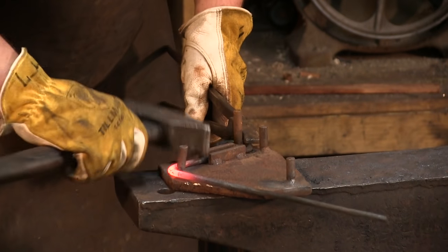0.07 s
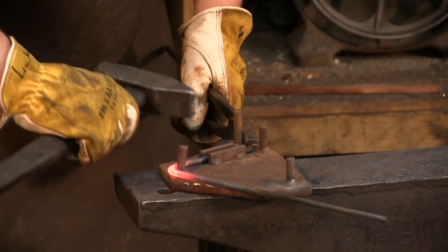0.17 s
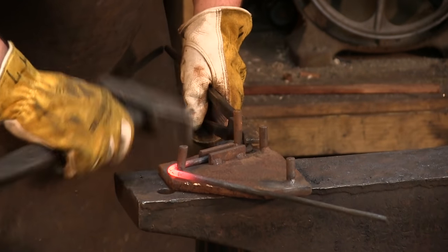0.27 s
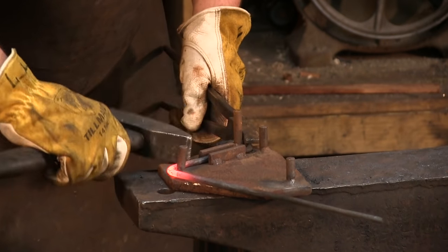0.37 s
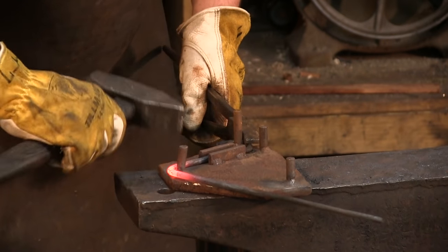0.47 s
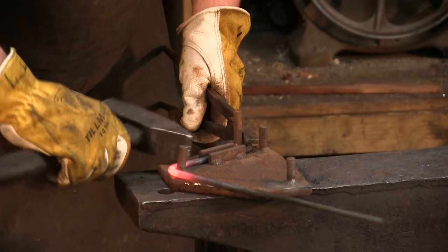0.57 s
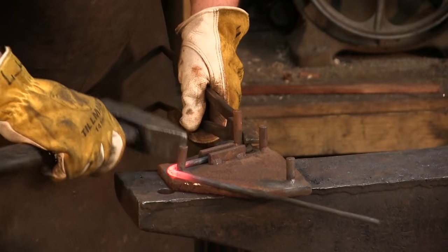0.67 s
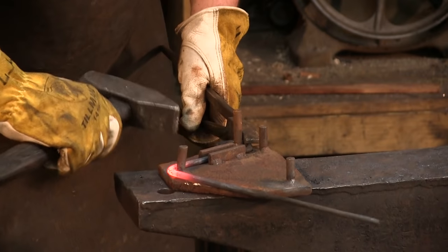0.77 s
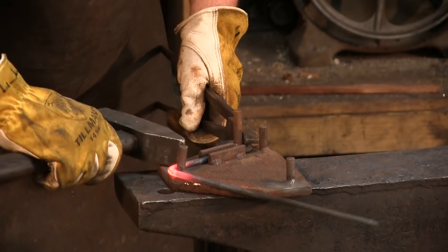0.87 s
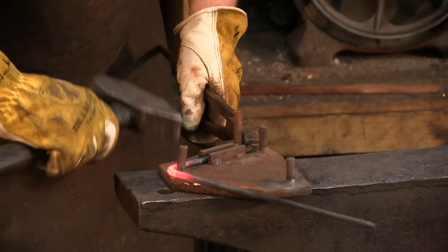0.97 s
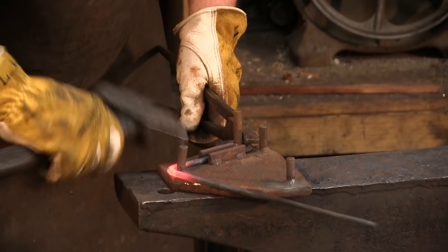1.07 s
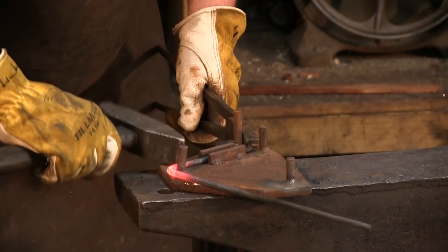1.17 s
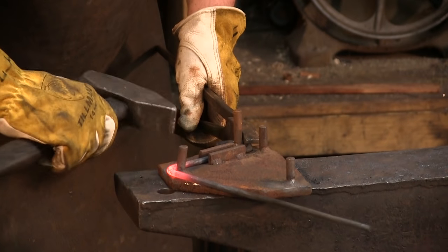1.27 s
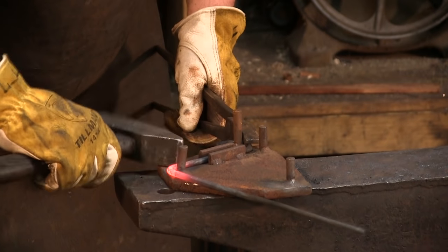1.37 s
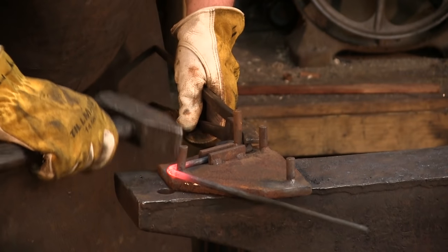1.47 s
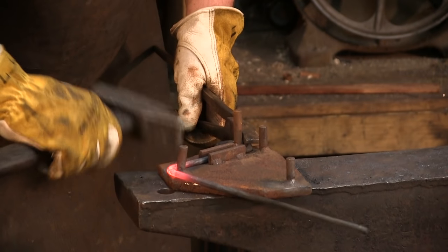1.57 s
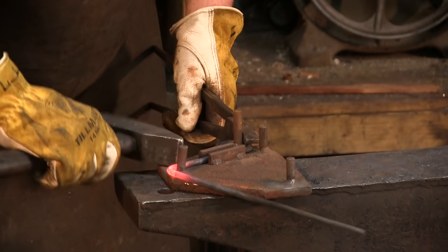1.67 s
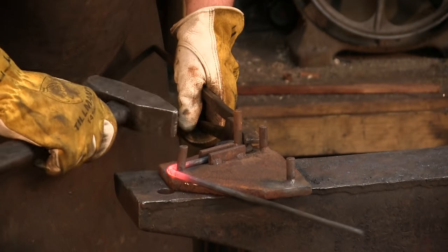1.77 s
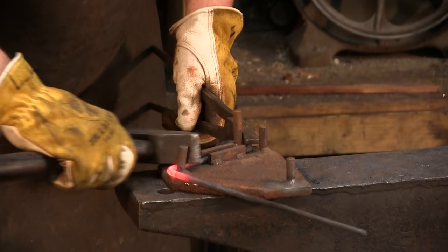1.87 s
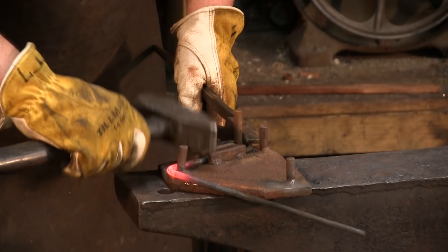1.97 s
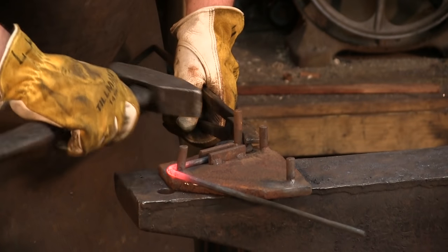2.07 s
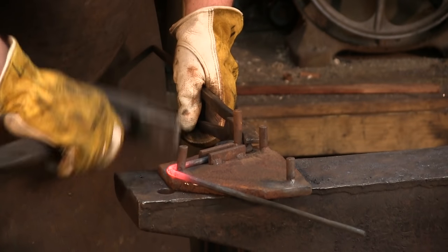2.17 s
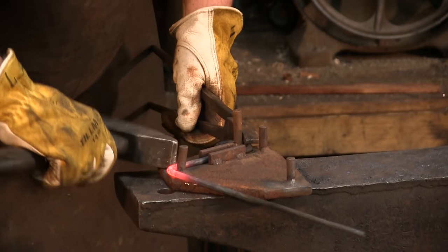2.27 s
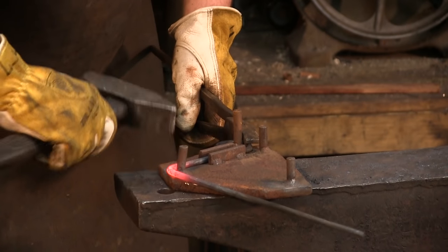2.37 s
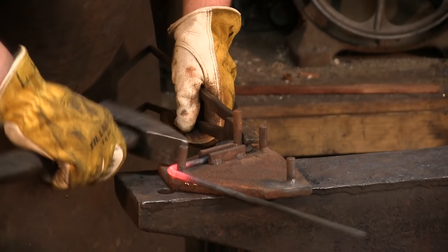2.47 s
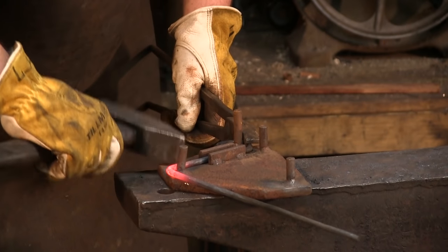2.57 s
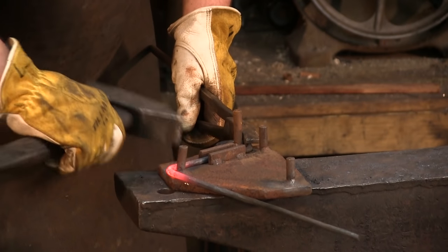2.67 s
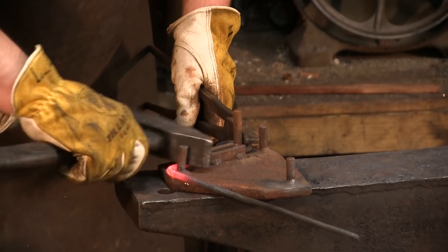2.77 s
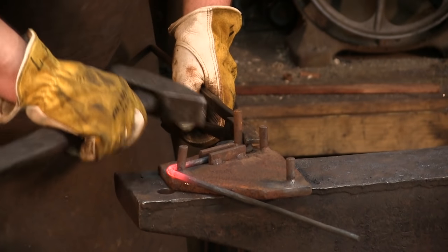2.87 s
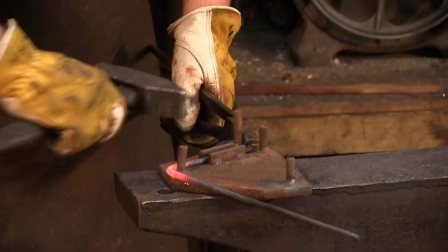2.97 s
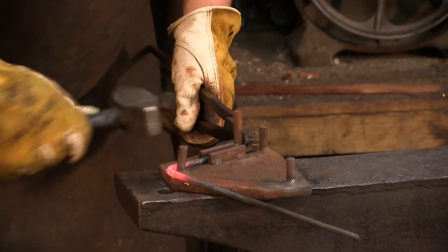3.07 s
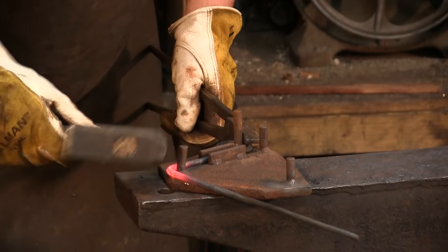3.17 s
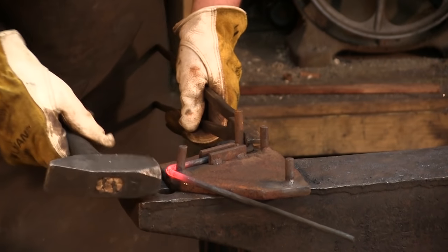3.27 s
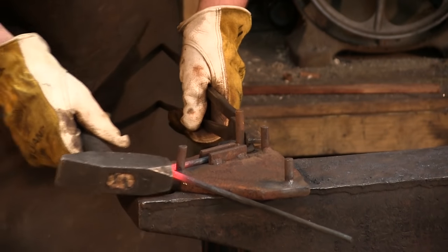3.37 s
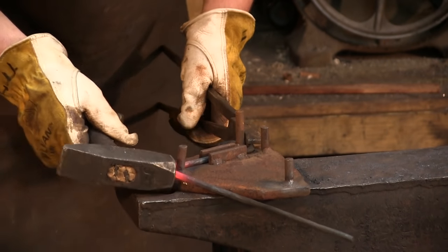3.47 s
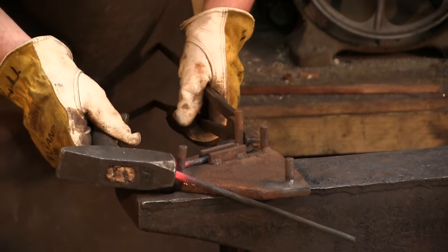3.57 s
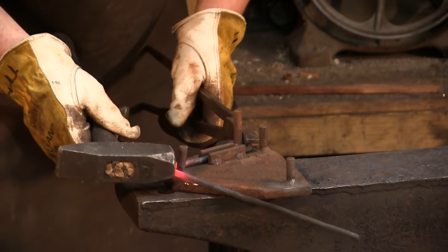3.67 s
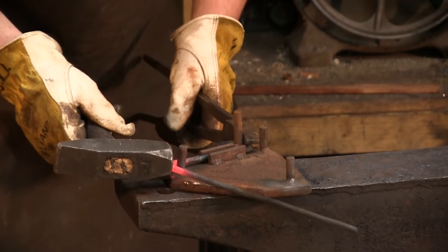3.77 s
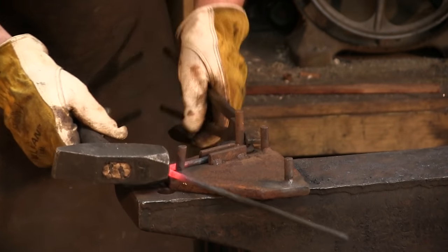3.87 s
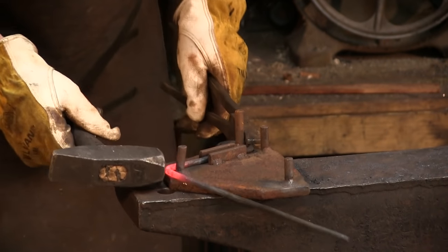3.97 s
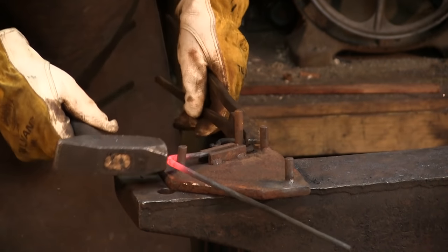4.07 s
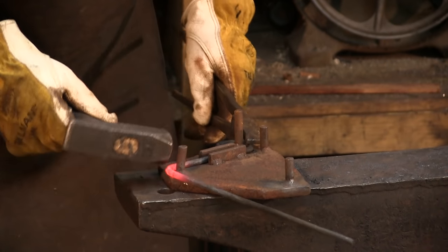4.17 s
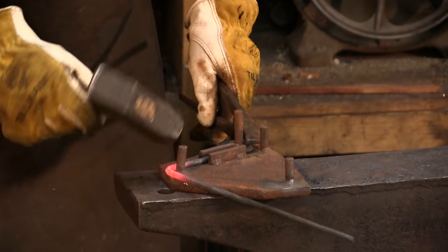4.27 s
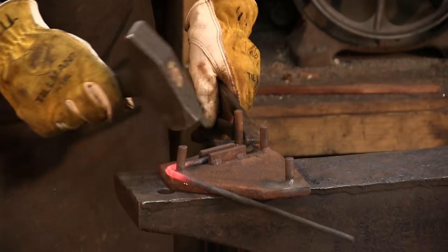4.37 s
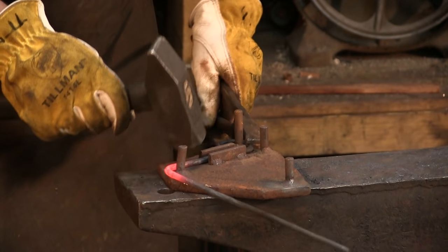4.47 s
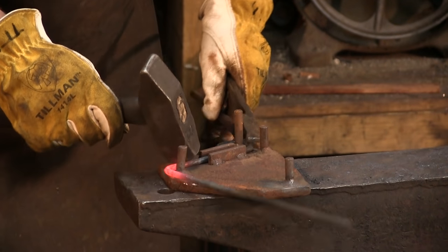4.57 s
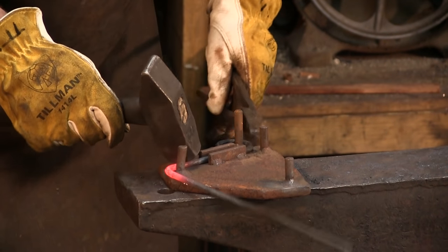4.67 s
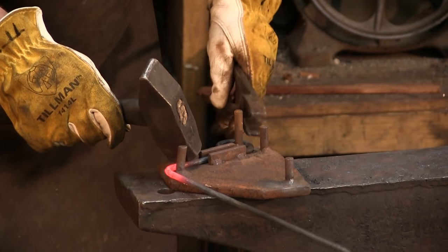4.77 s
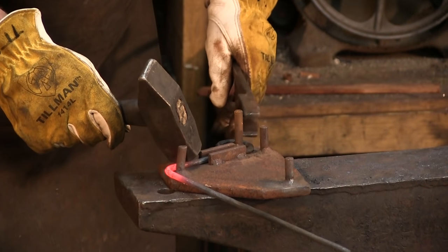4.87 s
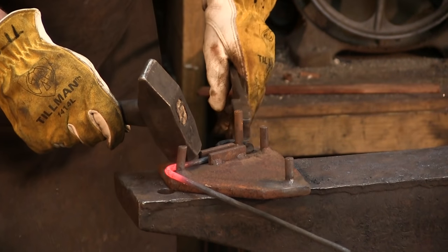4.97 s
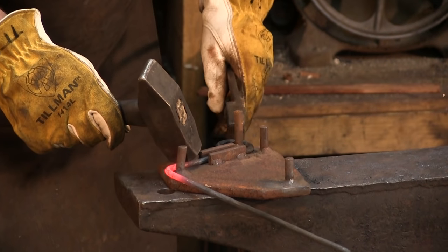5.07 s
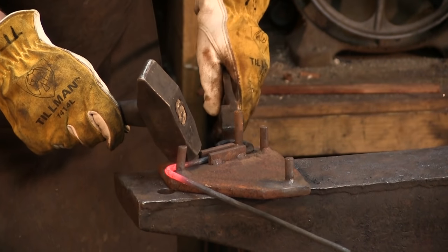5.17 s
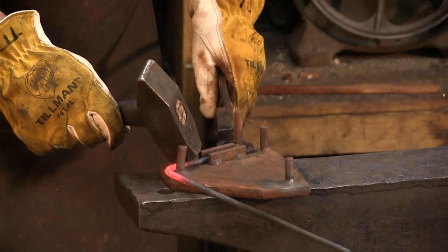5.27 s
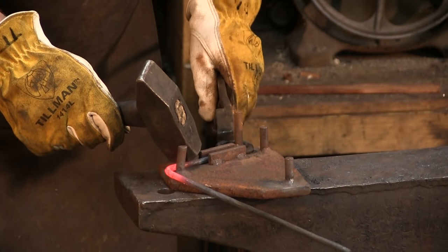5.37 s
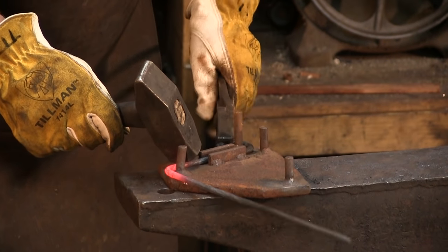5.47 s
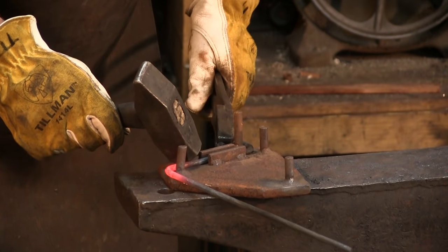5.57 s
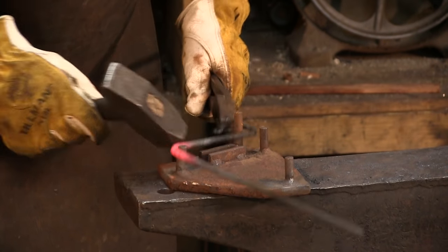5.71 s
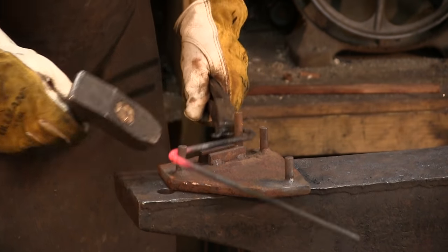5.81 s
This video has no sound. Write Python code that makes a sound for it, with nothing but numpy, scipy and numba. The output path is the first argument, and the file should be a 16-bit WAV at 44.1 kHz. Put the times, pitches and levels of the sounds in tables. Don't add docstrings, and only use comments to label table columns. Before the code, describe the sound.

A hand hammer strikes hot steel on an anvil jig in quick ringing blows, then scrapes, taps, and loose metallic knocks follow in a workshop.

```python
import sys
import numpy as np
from scipy import signal
from scipy.fft import rfft, irfft
from scipy.io import wavfile
from scipy.ndimage import uniform_filter1d
from numba import njit

SR = 44100
rng = np.random.default_rng(int(sys.argv[2]) if len(sys.argv) > 2 else 0)


def elevation(decibels):
    levels = np.asarray(decibels, float)
    return 10 ** (levels / 20)


def file_out(sig):
    cols = np.atleast_2d(sig).T
    lim = np.clip(cols, -1, 1)
    pcm = np.round(lim * 32767).astype(np.int16)
    wavfile.write(sys.argv[1], SR, pcm)


N = 257544
LEAD = SR // 4
M = N + LEAD


def along(table, hz):
    table = np.array(table)
    return np.interp(np.log(np.maximum(hz, 1)), np.log(table[:, 0]), table[:, 1])


def colour(x, spectrum):
    gain = elevation(along(spectrum, np.fft.rfftfreq(len(x), 1 / SR)))
    y = irfft(rfft(x) * gain, len(x))
    return y / np.sqrt(np.mean(y ** 2))


def band(x, lo_hz, hi_hz):
    return signal.sosfilt(signal.butter(2, (lo_hz, hi_hz), "bandpass", fs=SR, output="sos"), x)


def poles(modes):
    hz, _, t60 = np.transpose(modes)
    return np.exp(2j * np.pi * hz / SR - np.log(1000) / (np.clip(t60, .01, 3) * SR))


@njit
def resonate(force, poles, grip):
    out = np.zeros(force.shape[1])
    for m in range(len(poles)):
        z = 0j
        for i in range(force.shape[1]):
            z = z * poles[m] * grip[i] + force[m, i]
            out[i] += z.imag
    return out


def ring(modes, at, db, scatter_db, keep):
    chance = rng.standard_normal((len(at), 2, len(modes)))
    force, grip = np.zeros((len(modes), M)), np.ones(M)
    level_db = db[:, None] + np.array(modes)[:, 1] + scatter_db * chance[:, 0]
    force[:, at] = (elevation(level_db) * np.sign(chance[:, 1])).T
    grip[at] = np.clip(keep, 0, 1)
    return resonate(force + 1e-18, poles(modes), grip)


def burst(at, db, t60, noise):
    kicks = np.zeros(M)
    kicks[at] = elevation(db)
    decay = np.exp(-np.log(1000) / (t60 * SR))
    return noise * signal.lfilter([1], [1, -decay], kicks)


def where(table):
    s, *db = np.transpose(table)
    return LEAD + np.round(s * SR).astype(int), *db


def rattle(at, db, count):
    mean_gap_s, first_db, fall_db = .004, -8, -1.5
    gaps = rng.uniform(.3, 1.7, (len(at), count)) * mean_gap_s * SR
    again = at[:, None] + np.c_[np.zeros(len(at)), np.cumsum(gaps, axis=1)].astype(int)
    loss_db = np.r_[0, first_db + fall_db * np.arange(count)]
    return again.ravel(), *((column[:, None] + loss_db).ravel() for column in db)


# f/Hz, level per Hz/dB
SHOP_SPECTRUM = [(15, -41), (25, -9), (76, 3), (92, -4), (463, -9), (936, -14), (2160, -22), (4030, -16.5),
                 (5430, -20), (6050, -28.5), (7310, -15.5), (8360, -31.5), (12200, -35), (14800, -30.5),
                 (16000, -43)]


def shop():
    level_db, k = -56, SR // 6
    sway = uniform_filter1d(np.repeat(rng.standard_normal(N // k + 1), k), k)[:N]
    return colour(rng.standard_normal(N), SHOP_SPECTRUM) * elevation(level_db + 1.4 * sway)


# f/Hz, t60/s
ROOM_DECAY = [(80, 1.1), (210, 0.72), (560, 0.49), (1500, 0.49), (4000, 0.48), (8000, 0.46), (14000, 0.4)]


def room(dry):
    room_db, wall_db, wall_s = -9, -24.5, .1638
    t, tail = np.arange(SR) / SR, 0
    for hz in 63 * 2 ** np.arange(0, 8.5, .5):
        noise = colour(rng.standard_normal(SR), [(hz / 2.5, -40), (hz, 0), (hz * 2.5, -40)])
        tail = tail + noise * np.sqrt(hz) * elevation(-60 * t / along(ROOM_DECAY, hz))
    tail *= np.clip(t / 0.0071, 0, 1) ** 2
    tail *= elevation(room_db) / np.sqrt(np.sum(tail ** 2))
    slap = np.pad(band(dry, 4320, 4460), (int(wall_s * SR), 0))[:M]
    return dry + signal.fftconvolve(dry, tail)[:M] + elevation(wall_db) * slap


# touch t/s, fastest t/s, lift t/s, grit level/dB, chatter minus grit level/dB
DRAGS = [
    (3.174, 3.35, 3.47, -28.5, -12.5),
    (3.674, 3.768, 3.925, -32.5, 2.5),
]
# f/Hz, level per Hz/dB
GRIT_SPECTRUM = [(88, -37), (150, -7.5), (270, -8), (361, -4), (578, -8), (854, -6), (2600, -5.5),
                 (4580, -4), (16000, -35.5)]


def drag():
    touch_db, lift_db, swing_curve = -32.5, -39.5, 1.54
    t = (np.arange(M) - LEAD) / SR
    slips = rng.standard_normal(M) * (rng.random(M) < .2) * elevation(1.1 * rng.exponential(size=M))
    jolts = rng.standard_normal(M) * (rng.random(M) < .005)
    flutter = uniform_filter1d(np.repeat(rng.standard_normal(M // 200 + 1), 200), 200)[:M]
    grit = colour(slips, GRIT_SPECTRUM) * elevation(1.4 * flutter)
    chatter = colour(jolts, [(300, -14.5), (700, -17.0), (950, 3.5), (1300, -7), (2500, -34)])
    out = 0
    for touch, fastest, lift, grit_db, low_db in DRAGS:
        away = np.interp(t, (touch, fastest, lift), (1, 0, 1)) ** swing_curve
        db = grit_db + away * np.where(t < fastest, touch_db, lift_db)
        touching = (t > touch) & (t < lift)
        out = out + elevation(db) * touching * (grit + elevation(low_db - 2.5) * chatter)
    return out


# f/Hz, level/dB, t60/s
CLANG_MODES = [(4385, 1.5, 0.032), (4720, -24.5, .1), (4460, -21.5, 0.059), (4800, -21, 0.16),
               (4480, -17.5, .1), (4150, -30, 0.22), (4320, -22.5, 0.028), (4385, -15.5, 0.12),
               (4413, -12, 0.067), (4515, -16.5, 0.062)]
JIG_LOW_MODES = [(1320, -6, .04), (1527, -4, .1), (1590, -5, .05), (1805, -9, .06), (1950, -8, .03)]
JIG_HIGH_MODES = [(2300, -7, .03), (2470, -4, .04), (2670, -3, .04), (2860, -4, .035), (2995, -4, .06),
                  (3270, -4, .045), (3310, -6, .055), (3700, -7, .03)]
# f/Hz, level per Hz/dB
CRACK_SPECTRUM = [(200, -37), (800, 1), (1500, 2.5), (2800, 7), (4000, 1.5), (6000, -8.5), (10000, -50)]


def jig(at, pin_db, low_db, high_db, keep, crack_db):
    bodies = ring(CLANG_MODES, at, pin_db, 0.87, keep)
    bodies += ring(JIG_LOW_MODES, at, low_db + 0.5, 3.7, keep)
    bodies += ring(JIG_HIGH_MODES, at, high_db - 4, 3.7, keep)
    crack = burst(at, high_db + crack_db, 0.03, colour(rng.standard_normal(M), CRACK_SPECTRUM))
    return band(bodies, 700, 6000) + band(crack, 200, 15000)


def tick(at, db, t60):
    noise = colour(rng.standard_normal(M), [(3500, -31.5), (6000, 11), (12000, -7), (16000, -11.0)])
    return burst(at, db, t60, noise)


# t/s, force level/dB, dullness/dB, handle ring level/dB, tick level/dB
KNOCKS = [(0.185, -22.5, 1, -76, -39), (3.1532, -45, -4, -82, -42.5), (3.2154, -44, -10, -71, -68),
          (4.2732, -26.5, -9.5, -51, -32), (4.5336, -49.5, -18, -85, -52), (4.591, -50.5, -17, -85, -69),
          (4.6548, -25, -20, -71, -38.5), (4.6674, -27, -30, -63, -51), (4.6818, -27, -22, -66, -57),
          (4.8055, -32.5, -22, -72, -59), (4.8324, -32, -4.5, -83, -68), (4.8703, -41, -19, -84, -71),
          (5.4004, -35.5, 1, -84, -69), (5.5318, -30, -20, -59, -33), (5.5454, -32, -14, -70, -34),
          (5.5844, -41, -19, -75, -60), (5.6136, -42.5, -5.5, -79, -64), (5.6294, -52.5, -8, -85.5, -65),
          (5.75, -58, -13, -76, -63), (5.7644, -54, -12, -73, -57), (5.7894, -55, -10, -69, -59)]
# f/Hz; then level/dB, t60/s
HANDLE_HZ = [7472, 8468, 9932, 12260, 12440, 14010]
HANDLE_RING = [(-1, 0.24), (-20, 0.23), (-4, .22), (-10, 0.2), (-9, 0.33), (-23, 0.19)]
# f/Hz; then level/dB, t60/s
CHEEK_HZ = [5060, 5152, 5232, 5690, 5900]
CHEEK_RING = [(-5, .06), (0, .17), (-3, .26), (-9, .25), (-6, .12)]


def tongs():
    at, force_db, dull_db, ring_db, tick_db = where(KNOCKS)
    miss_db = np.maximum(dull_db + 8.5, 0)
    pin_db = force_db - 1 - 2.8 * miss_db
    handles = ring(np.column_stack([HANDLE_HZ, HANDLE_RING]), at, ring_db + 10.0, 0.73, keep=0.72)
    jaws = ring(np.column_stack([CHEEK_HZ, CHEEK_RING]), at, pin_db - 15.5, 2.7, keep=0.45)
    loose = rattle(at, (pin_db - 1.5, force_db + dull_db - 4.0, force_db - 0.5), count=3)
    soft_db = np.repeat(miss_db, len(loose[0]) // len(at))
    knocks = jig(*loose, keep=1.0, crack_db=-6.0 - 1.6 * soft_db)
    return knocks + handles + band(jaws, 2000, 12000) + tick(at, tick_db + 3.0, 0.012)


# t/s, force level/dB, face clang minus force level/dB, head ring level/dB, crack level/dB
BLOWS = [(0.1009, -26, 2, -36.5, -26.5), (0.1069, -24, 6.5, -34, -37.5), (0.4123, -8.5, 6.5, -21.5, -20.5),
         (0.6827, -8, -11, -30, -17), (0.9382, -8, 1, -19.5, -38), (1.201, -9.5, 1, -26, -15.5),
         (1.4597, 2, 7, -17.5, -19), (1.471, -4.5, -4.5, -19.5, -16.5), (1.712, -10, -2, -26, -14),
         (1.949, -6.5, -12.5, -23.5, -15), (2.3129, 2.5, 4, -15, -14.5), (2.586, 0, 7.5, -17.5, -15),
         (2.8252, -4, -10, -32.5, -22), (2.8361, -2, 7.5, -20.5, -14.5)]
BOUNCES = [(0.1119, -17, -8, -27.5, -42), (0.4418, -10.5, 7.5, -28, -34), (0.7131, -7, 6, -32, -31.5),
           (0.9586, -15, 8, -33, -39), (1.2275, -6, 7, -18.5, -29.5), (1.735, -7.5, 9, -35.5, -22),
           (1.9655, -3, -6, -32.5, -22.5), (2.3229, -25, 14, -21.5, -45.5), (2.8511, -12.5, 5, -20, -25.5),
           (3.5166, -8.5, 3, -30.5, -24.5)]
# the same level/dB columns, without t/s
EARLIER_DB = (-14.5, -0.5, -29, -34)


def contacts():
    earlier_s, yield_db = -.15, -12
    rows = [(earlier_s, *EARLIER_DB), *BLOWS, *BOUNCES]
    at, force_db, face_db, head_db, crack_db = where(rows)
    share_db = np.where(np.arange(len(rows)) <= len(BLOWS), 1, -8.5)
    return at, force_db, face_db, head_db, crack_db, np.minimum(force_db, yield_db) + share_db


# t/s, stand level/dB, anvil body level/dB
THUDS = [(0.116, -12, -18.5), (0.185, -33, -27.5), (3.432, -42, -39.5), (3.516, -50, -23),
         (3.741, -51, -41), (3.778, -45, -27), (3.939, -29, -38), (4.272, -36.5, -44.5),
         (4.663, -38, -37.5), (4.712, -30.5, -41), (4.831, -36.5, -38.5), (4.914, -37, -39),
         (5.401, -37, -39), (5.544, -37, -45), (5.765, -46, -50.5)]
# t/s, level/dB
TAPS = [
    (3.2577, -30.5),
    (3.3118, -20),
    (3.4317, -30.5),
    (3.9383, -9),
]
# f/Hz, level/dB, t60/s
STAND_MODES = [(126, -3.5, 0.043), (156, -2, 0.049), (230, 0.5, 0.031), (310, -3.5, 0.039),
               (375, 3.5, 0.02)]
ANVIL_MODES = [(504, 4, 0.037), (576, 0, 0.015), (672, 6.5, 0.027), (877, 8, 0.031), (972.6, -4.5, 0.31),
               (1080, 3.5, .03)]
EDGE_MODES = [(969, -8, 0.031), (1550, 2, 0.054), (1830, 1, .04), (2546, 3.5, 0.068), (2630, -1.5, 0.027),
              (2874, -4, 0.042), (3000, -17, .04), (3330, -10.5, 0.057), (4430, -17, 0.048),
              (5100, -15, .05)]
# f/Hz; then level/dB, t60/s
FREE_JIG_HZ = [969, 1314, 1529, 1809, 2466, 2552, 2632, 2918, 3052, 3332, 5076]
FREE_JIG_RING = [(-12, .3), (-10, .2), (-3, .33), (-14, .6), (2, .1), (-6, .2), (-3, .42), (-14, .45),
                 (-14, .35), (-8, .15), (-14, .06)]


def anvil():
    stand_lag_s, body_lag_s = .005, .0012
    loaded_s, pressed_db = .02, -14
    blow_at, *_, depth_db = contacts()
    rock_at, stand_db, body_db = where(THUDS)
    tap_at, tap_db = where(TAPS)
    since = blow_at[:, None] - blow_at
    loaded_db = pressed_db * ((since > 0) & (since < loaded_s * SR)).any(axis=1)
    stand_at = np.r_[blow_at + int(stand_lag_s * SR), rock_at]
    push_db = np.r_[depth_db - 7.5 + loaded_db, stand_db - 2.5]
    stand = ring(STAND_MODES, stand_at, push_db, scatter_db=0.5, keep=0.31)
    body = ring(ANVIL_MODES, blow_at + int(body_lag_s * SR), depth_db - 13.5, scatter_db=1.6, keep=0.87)
    body += ring(ANVIL_MODES, *rattle(rock_at, [body_db - 5.5], count=2), scatter_db=2.5, keep=0.68)
    taps = ring(EDGE_MODES, *rattle(tap_at, [tap_db - 7.5], count=2), 0.47, keep=0.79)
    taps += ring(np.column_stack([FREE_JIG_HZ, FREE_JIG_RING]), tap_at, tap_db - 27.0, 0, keep=0.97)
    taps += burst(tap_at, tap_db - 3, 0.04, band(rng.standard_normal(M), 270, 1800))
    thud = band(band(stand, 95, 600), 95, 900)
    return thud + band(body, 350, 1800) + band(band(taps, 450, 5500), 300, 6500)


# f/Hz; then level/dB, t60/s
HEAD_HZ = [6760, 6935, 7456, 6785]
HEAD_RING = [(-3, .35), (-10, .5), (-9, .22), (-9, .2)]
# t/s, level/dB
SIDE_FACE_MODES = [(2471, -15, .15), (2692, -10, .12), (3311, -5, .08), (4377, -9, .2), (5152, -2, .25),
                   (5233, -8, .45), (5690, -21, .5), (5900, -16, .2), (6761, -15, .45), (9324, -36, .3)]
SIDE_BLOW = [
    (3.5163, -16),
]
# f/Hz, level/dB, t60/s
BAR_MODES = [(1535, -4, .25), (1575, 0, .35), (3000, -6, .3), (3052, -6, .35), (3300, -8, .3)]


def hammer():
    at, force_db, face_db, head_db, crack_db, depth_db = contacts()
    head = ring(np.column_stack([HEAD_HZ, HEAD_RING]), at, head_db + 0.5, 0.99, keep=0.25)
    head += ring(np.column_stack([CHEEK_HZ, CHEEK_RING]), at, force_db - 16.5, 1.5, keep=.3)
    head += ring(SIDE_FACE_MODES, *where(SIDE_BLOW), 0, keep=1)
    t = (np.arange(M) - LEAD) / SR
    for touch, _, lift, *_ in DRAGS:
        resting = (t > touch) & (t < lift + .03)
        head *= np.where(resting, elevation(-800 * (t - touch).clip(0, 1)), 1)
    bar = ring(BAR_MODES, at, depth_db - 15, 3, keep=.6)
    struck = jig(at, force_db + face_db, depth_db, force_db, keep=0.3, crack_db=2.0)
    return struck + band(head, 2000, 12000) + band(bar, 700, 6000) + tick(at, crack_db - 0.5, 0.041)


def scene():
    steel = hammer() + tongs() + anvil() + drag()
    return (room(steel)[LEAD:] + shop())[None]


def low_pass(x):
    return signal.sosfilt(signal.butter(12, 16470, fs=SR, output="sos"), x)


def record(dry):
    top = np.where(dry > 0, .7, .58)
    x = dry / (1 + np.abs(dry / top) ** 5) ** (1 / 5)
    x = signal.sosfilt(signal.butter(1, 15, "highpass", fs=SR, output="sos"), x)
    x = signal.sosfilt(signal.cheby2(10, 42, 16500, fs=SR, output="sos"), x)
    return low_pass(x)


dry = scene()
out = record(dry)
file_out(out)
```